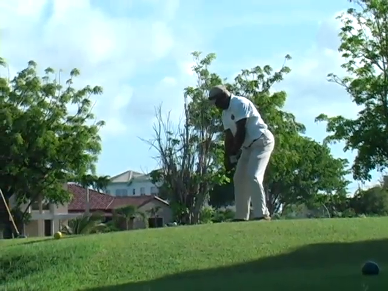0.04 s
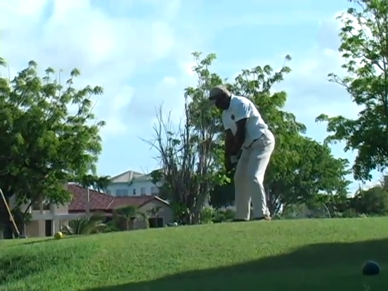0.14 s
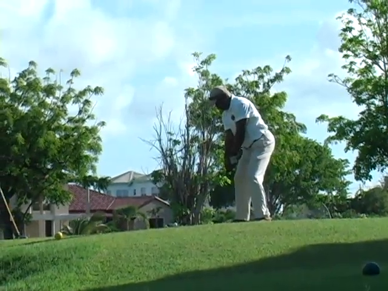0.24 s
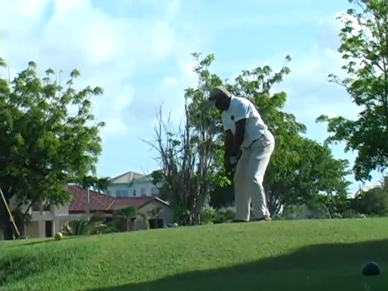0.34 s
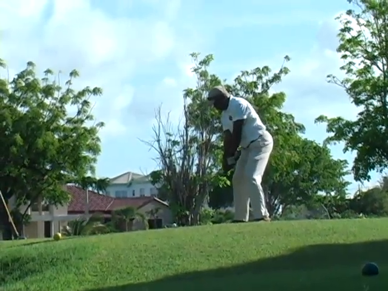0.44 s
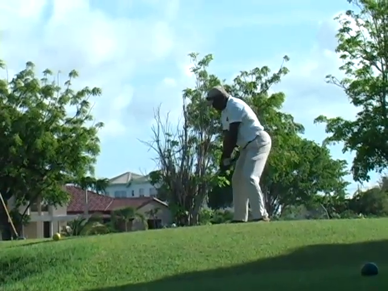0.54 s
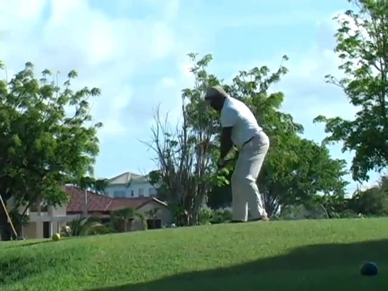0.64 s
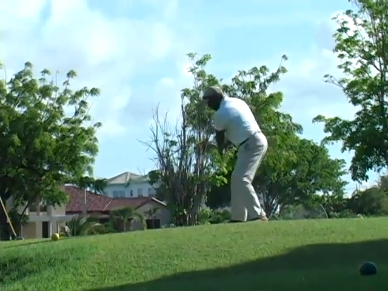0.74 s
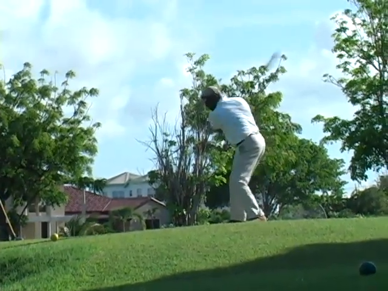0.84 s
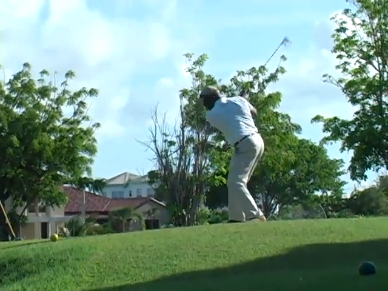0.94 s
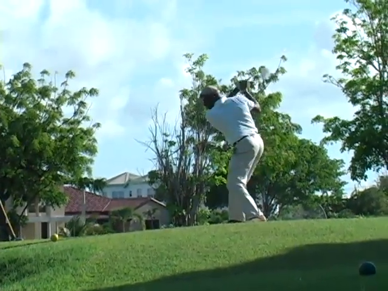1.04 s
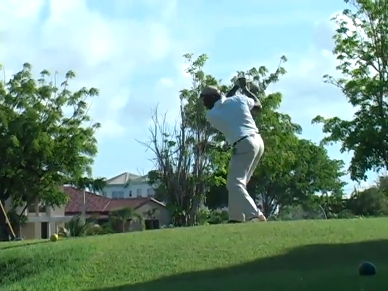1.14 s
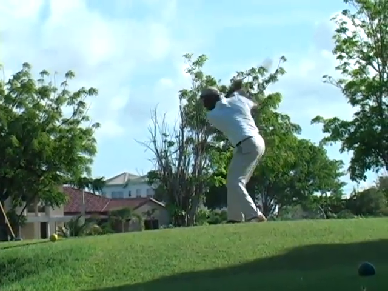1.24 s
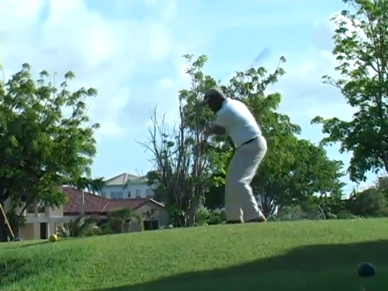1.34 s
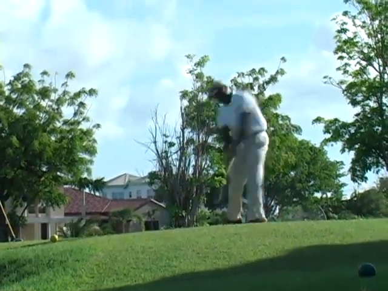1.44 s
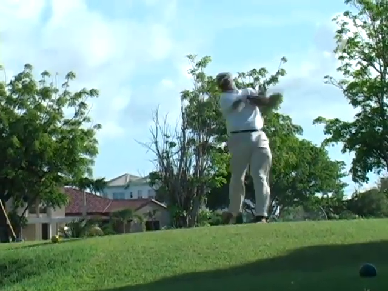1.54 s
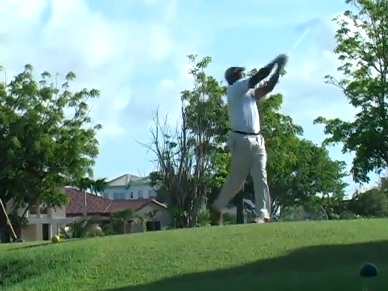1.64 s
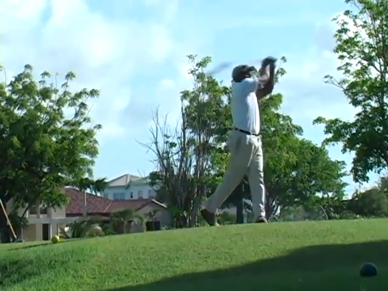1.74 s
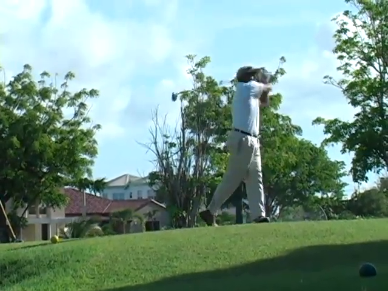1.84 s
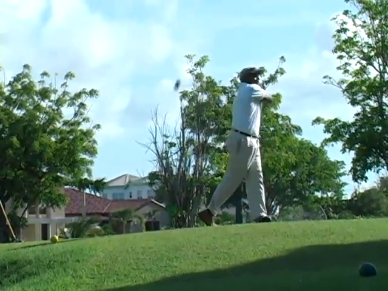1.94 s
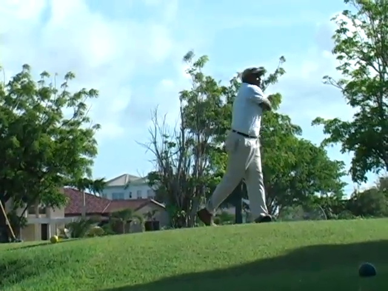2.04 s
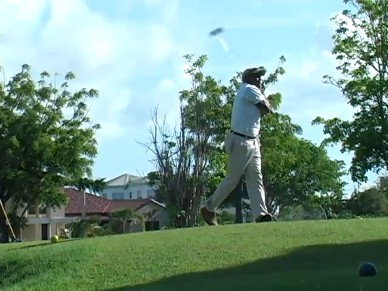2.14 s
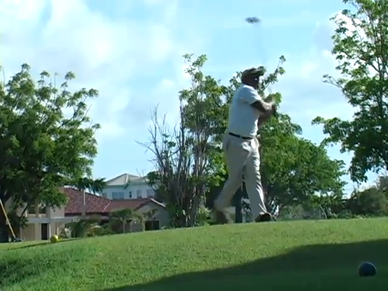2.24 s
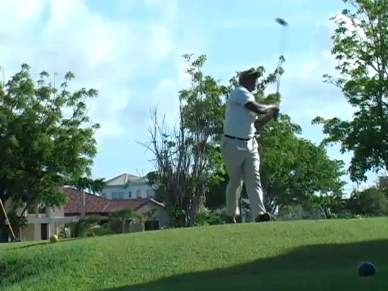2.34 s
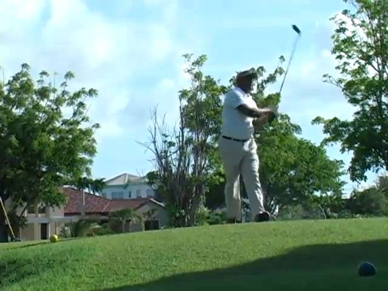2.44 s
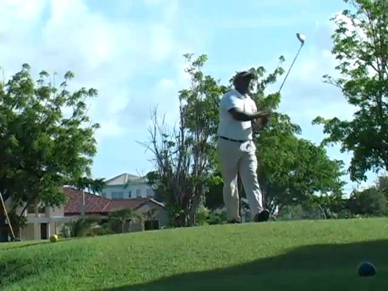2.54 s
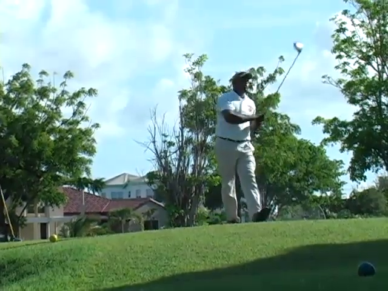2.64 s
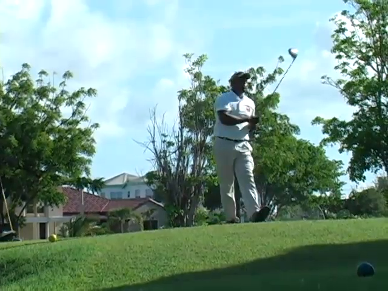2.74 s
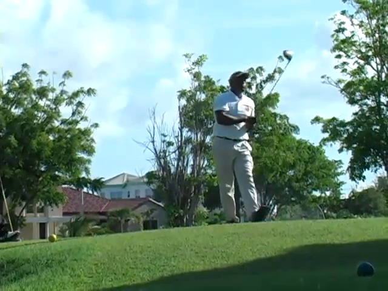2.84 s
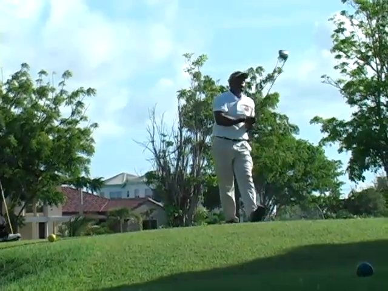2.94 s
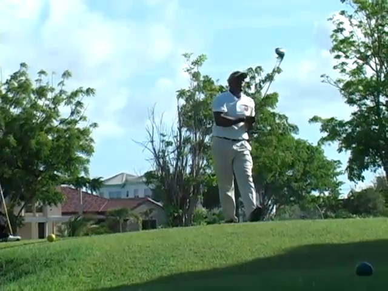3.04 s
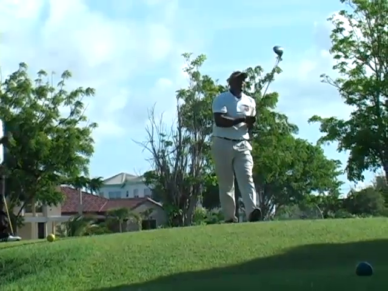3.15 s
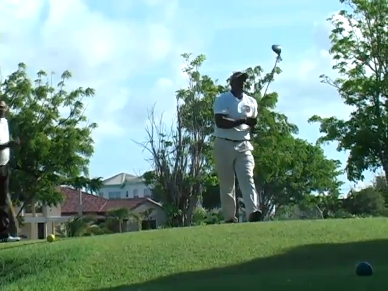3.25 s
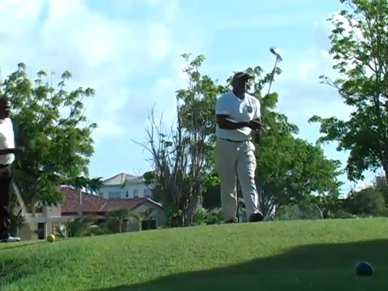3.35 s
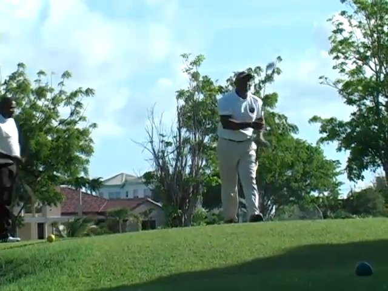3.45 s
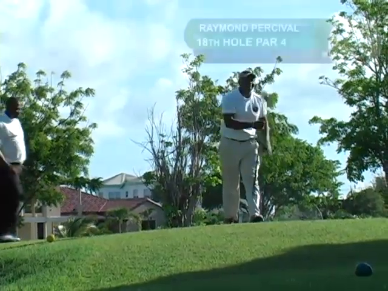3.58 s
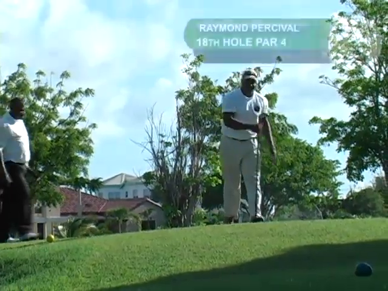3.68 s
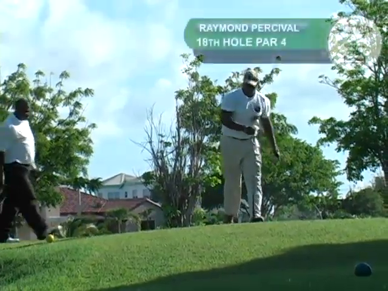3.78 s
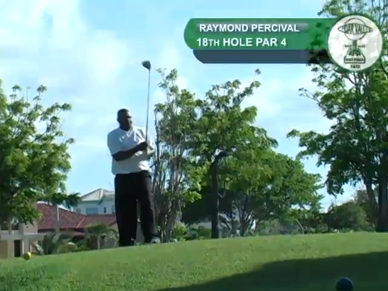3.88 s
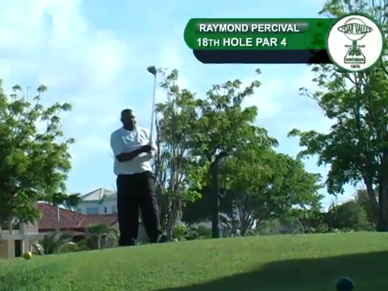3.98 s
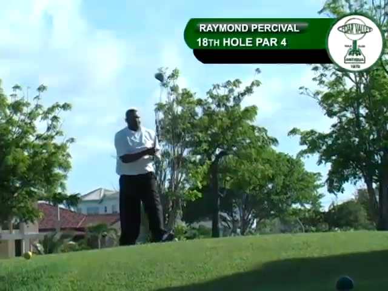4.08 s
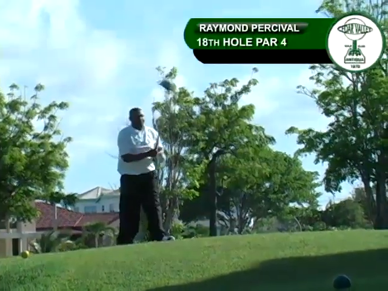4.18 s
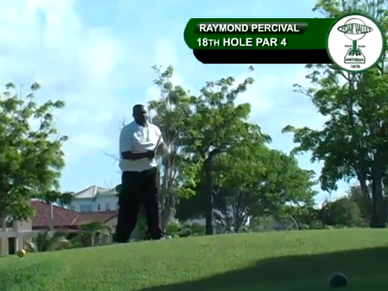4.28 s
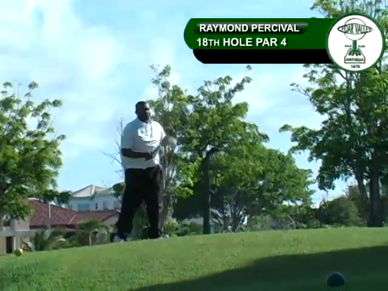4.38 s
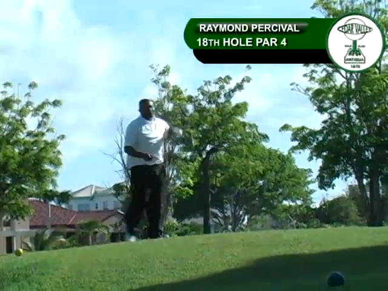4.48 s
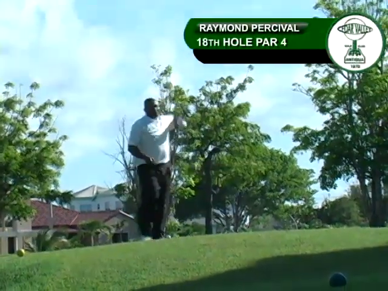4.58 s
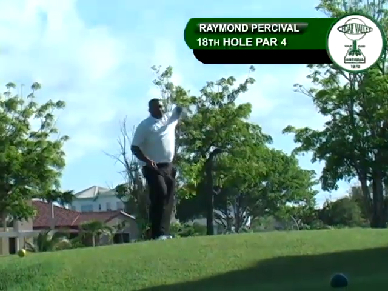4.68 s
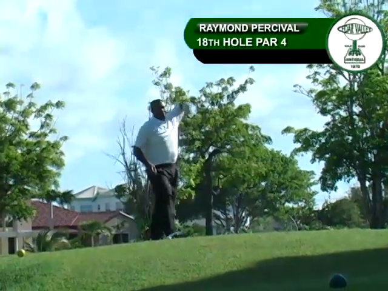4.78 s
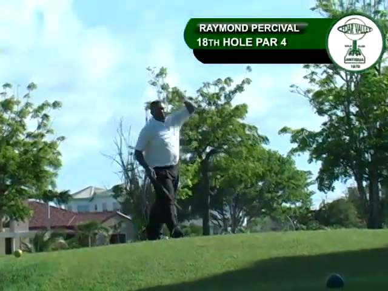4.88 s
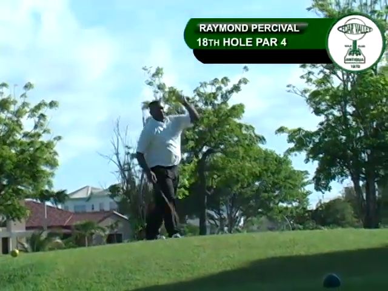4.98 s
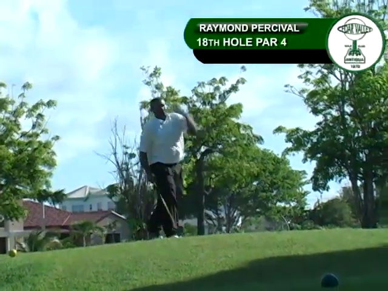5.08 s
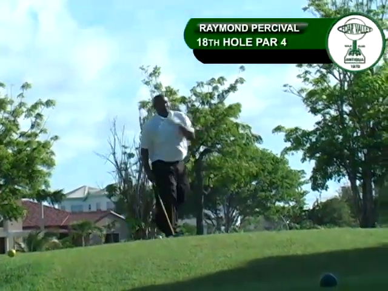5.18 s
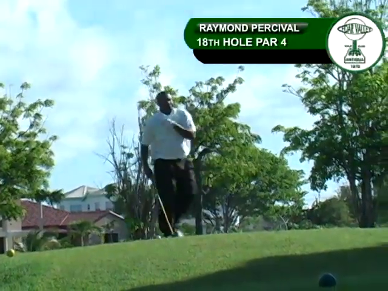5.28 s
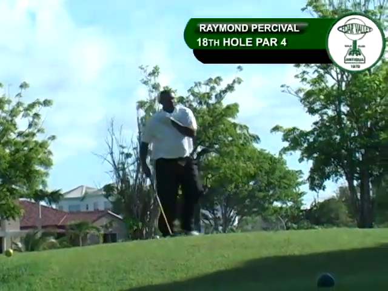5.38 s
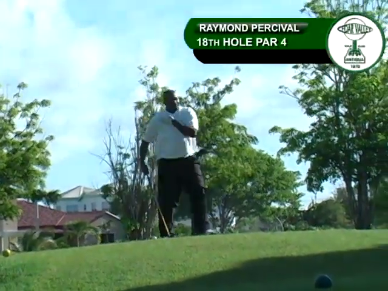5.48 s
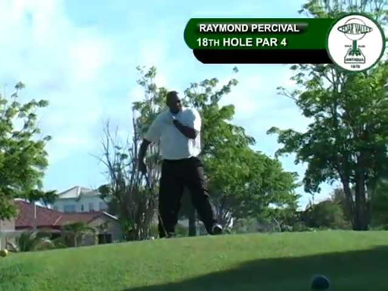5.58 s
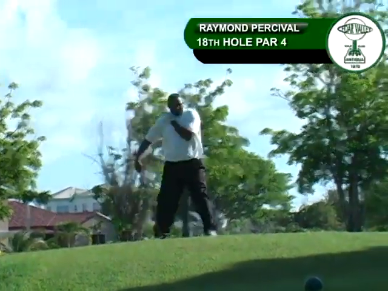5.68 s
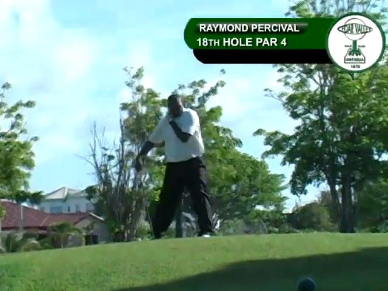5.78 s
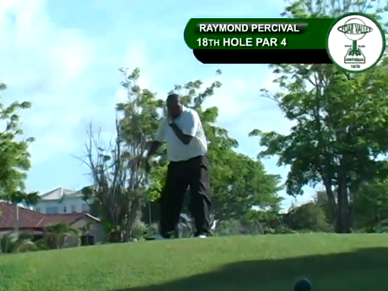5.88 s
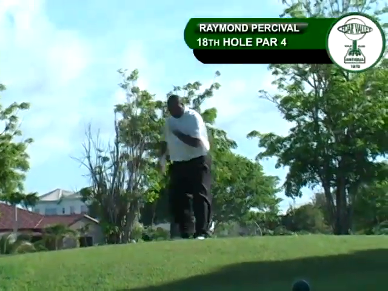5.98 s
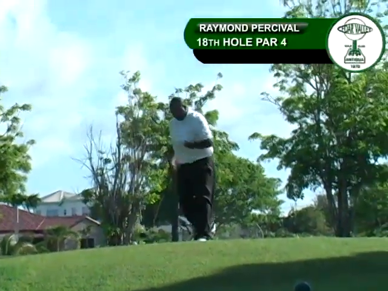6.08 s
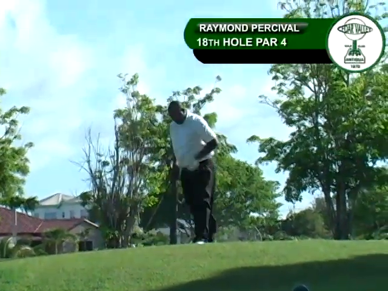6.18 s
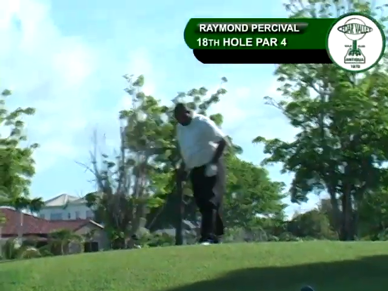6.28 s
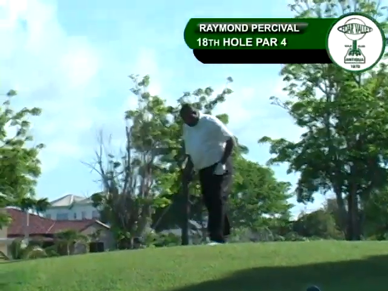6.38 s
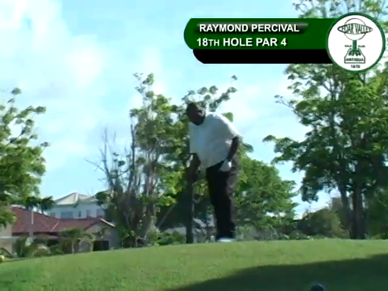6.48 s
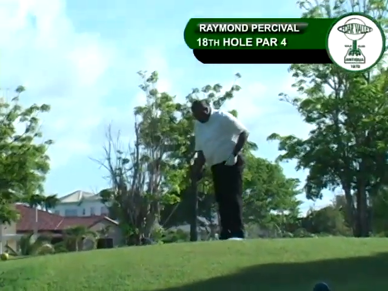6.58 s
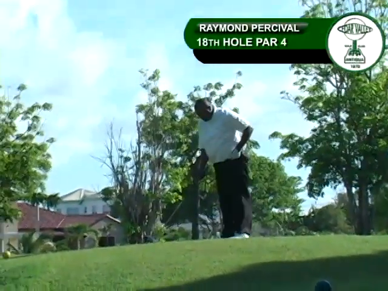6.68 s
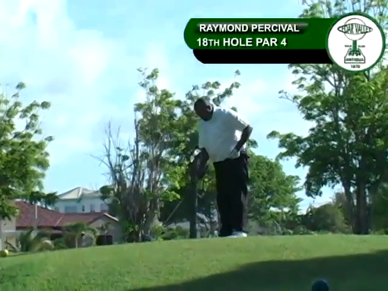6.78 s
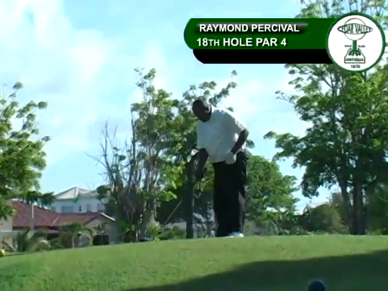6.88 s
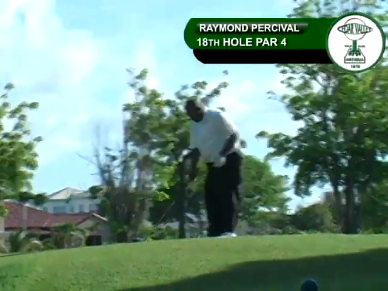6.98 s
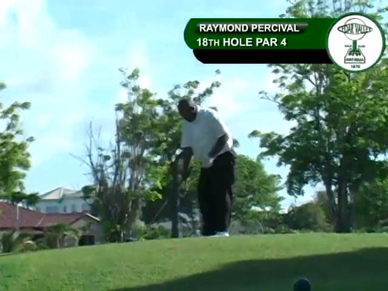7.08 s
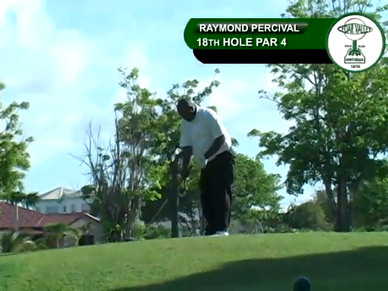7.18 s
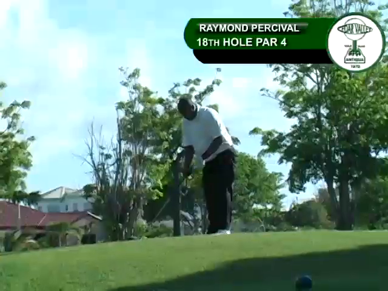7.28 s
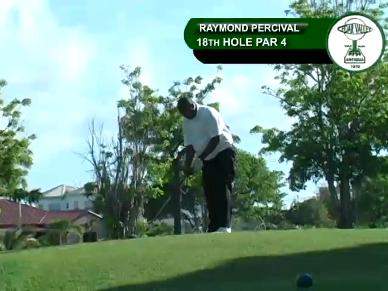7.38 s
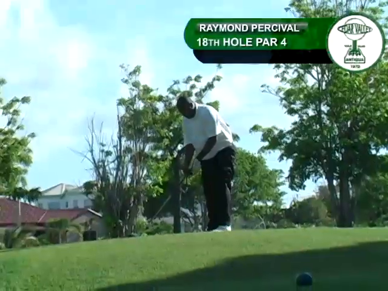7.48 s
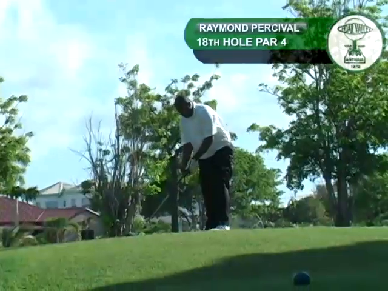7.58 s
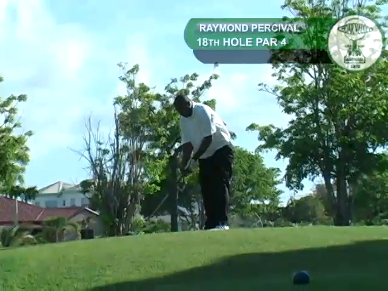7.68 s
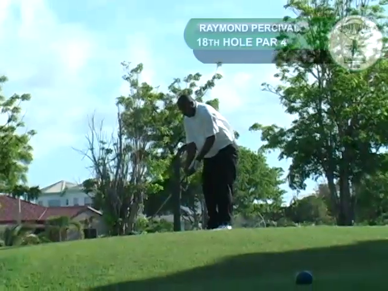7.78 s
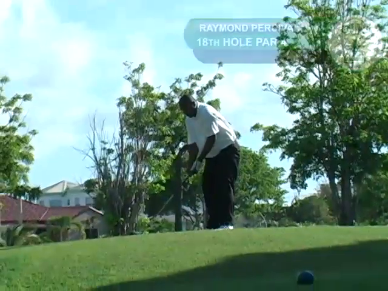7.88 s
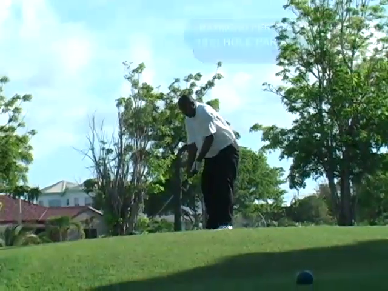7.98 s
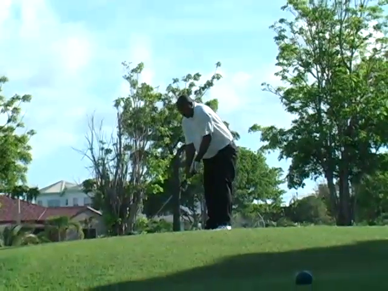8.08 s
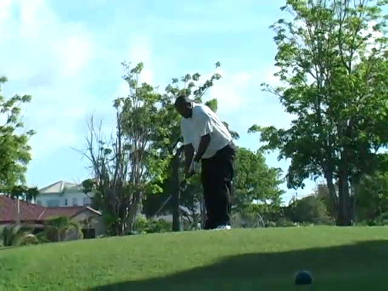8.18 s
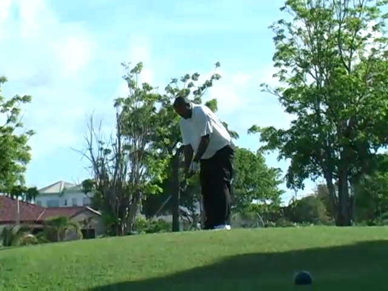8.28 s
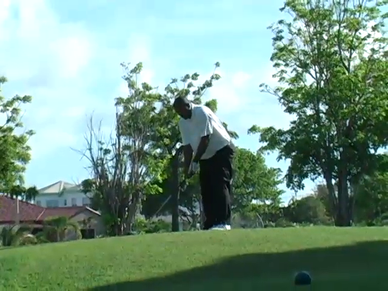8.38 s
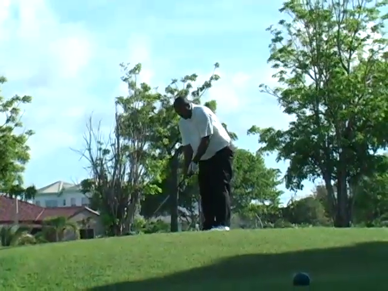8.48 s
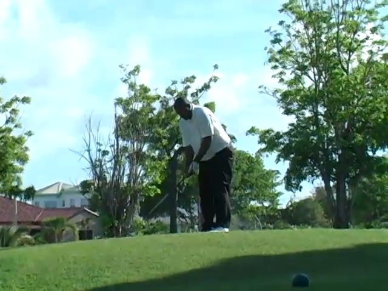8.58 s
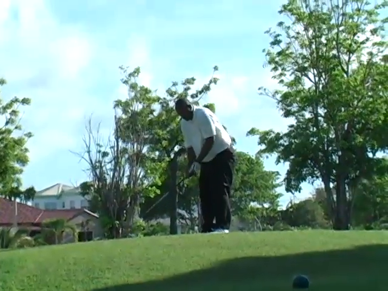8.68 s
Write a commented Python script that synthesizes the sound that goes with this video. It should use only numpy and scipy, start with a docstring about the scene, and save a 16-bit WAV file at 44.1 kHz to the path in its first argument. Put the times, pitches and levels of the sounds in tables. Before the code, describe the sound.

A single outdoor microphone near a golf tee picks up gentle air and wind buffeting. A driver whips down and strikes a ball very loudly, its thin metal head pinging and scattering back from walls and foliage. Faint falling bird notes follow, then a sudden small buzz and thud with slightly louder hush. Near the end, one close bird sings high paired whistles that swell, followed by rasping chirps, while a dog barks far away.

```python
"""Open tee near houses and trees: a hollow metal driver swishes down and cracks a ball away.
The head rings as damped modes, pitch bent by its own motion, and echoes off houses and trees.
A near songbird and farther birds whistle pitch glides; banded rough noise buzzes, bursts and hisses; a far
dog barks. Wind rumbles on the microphone over a filtered-noise hush. Levels are set before the x2 input gain.
Left: the one microphone. Right: amplifier hiss, and a thump when the left overloads."""
import sys
import numpy as np
from scipy import signal
from scipy.fft import rfft, irfft
from scipy.io import wavfile
from scipy.ndimage import uniform_filter1d, map_coordinates

SR = 44100
rng = np.random.default_rng(int(sys.argv[2]) if len(sys.argv) > 2 else 0)


def dump_mix(stems):
    """Bounce the given channels to the path in sys.argv[1] as a 16-bit WAV at rate SR."""
    frames = np.atleast_2d(stems).T  # one column per channel
    limited = np.clip(frames, -1, 1)  # hard clip at full scale
    pcm = np.round(limited * 32767).astype(np.int16)
    wavfile.write(sys.argv[1], SR, pcm)


N = 384993


def amp(db):
    """Decibels to amplitude."""
    return 10 ** (np.asarray(db) / 20)


def rms_one(x):
    """Scale to rms 1."""
    return x / np.sqrt(np.mean(x ** 2) + 1e-20)


def in_time(rows, **ends):
    """Interpolate each column over the whole scene; the first column is seconds."""
    s, *columns = np.transpose(rows)
    return [np.interp(np.arange(N) / SR, s, c, **ends) for c in columns]


def add(out, start_s, x):
    """Mix a short sound in at a time."""
    i = round(start_s * SR)
    out[i:i + len(x)] += x[:len(out) - i]


def coloured(spectrum):
    """Noise of a given spectrum, rms 1."""
    hz, db = np.transpose(spectrum)
    grid_hz = np.maximum(np.fft.rfftfreq(N, 1 / SR), 1)
    gain = amp(np.interp(np.log(grid_hz), np.log(hz), db))
    return rms_one(irfft(rfft(rng.standard_normal(N)) * gain, N))


def drift(knots_per_s):
    """Smooth random curve through unit-spread knots."""
    knots = rng.standard_normal(int(N / SR * knots_per_s) + 2)
    return map_coordinates(knots, [np.arange(N) / SR * knots_per_s], order=3)


def band(x, low_hz, high_hz):
    """Band-pass, upper edge kept below Nyquist."""
    edges_hz = [low_hz, min(high_hz, .45 * SR)]
    return signal.sosfilt(signal.butter(2, edges_hz, "band", fs=SR, output="sos"), x)


def swell(n, rise_share):
    """Rounded rise over a share of the length, rounded fall over the rest."""
    return np.sin(np.pi / 2 * np.interp(np.arange(n), [0, rise_share * n, n], [0, 1, 0]))


def tone(hz, db, overtone_db):
    """Whistle along a pitch track with its octave; levels are rms."""
    phase = 2 * np.pi * np.cumsum(hz) / SR
    octave = np.sin(2 * phase) * (hz < SR / 4)
    return np.sqrt(2) * (amp(db) * np.sin(phase) + amp(overtone_db) * octave)


def modes(table, t, bent_t):
    """Damped sines: decay runs on t, phase on bent_t."""
    return sum(amp(db - 60 * t / t60_s) * np.sin(2 * np.pi * hz * bent_t) for hz, db, t60_s in table)


def patchy(x, patchy_db, knots_per_s):
    """Third-octave bands flicker each on their own."""
    edges_hz = 250 * 2 ** np.arange(0, 6.1, 1 / 3)
    return sum(amp(patchy_db * drift(knots_per_s)) * band(x, low, high)
               for low, high in zip(edges_hz, edges_hz[1:]))


STRIKE_S, CRACK_DB = 1.5336, -3.5
GROUND_DELAY_S, GROUND_DB = .0045, -3   # bounce off the turf, re crack
SNAP_DB, SNAP_T60_S = -13, 0.014        # ball's cover; dB of the noise before its band
SIZZLE_DB, SIZZLE_T60_S = -18, 0.4      # bright early scatter; dB before its band
# face and ball modes: pitch_hz, level_db (re crack), t60_s
CRACK_MODES = [(287, -31, 0.012), (730, -31, 0.007), (1116, 2, 0.0045), (1550, 1, 0.0052),
               (1920, -4, 0.0088), (2400, -4.5, 0.0068), (4590, 0.5, 0.0077), (5040, -3.5, 0.0077),
               (6560, -4, 0.017), (9200, -7, 0.01), (11000, -9, 0.01), (12900, -23, 0.0088)]
# hollow shell modes at pitch ratio 1: pitch_hz, level_db (before path or echo gain), t60_s
HEAD_MODES = [(4180, -22.5, 0.4), (6100, -35, .2), (6380, -17.5, 0.15), (6930, -32, 0.68),
              (7030, -32, 0.49), (8260, -40, .2), (9230, -27, 0.28), (10500, -38, .12)]
# head turning and swinging away: after_blow_s, pitch_ratio, level_db
HEAD_PATH = [(0, 1.2, -22), (.016, 1.03, -7), (0.033, 1.0, 6.5), (0.048, .97, 4), (.062, .955, -10),
             (.12, 1.1, -28)]
# walls behind the tee, hearing the receding head lower: delay_s, level_db, length_s
WALL_ECHOES = [(0.105, -14, 0.019), (0.116, -26, .025), (0.146, -17.5, 0.024), (.184, -14.5, 0.016),
               (0.203, -14.5, 0.093), (0.261, -29, .05), (.32, -33, 0.097), (0.387, -39, 0.1),
               (0.55, -36, 0.04)]
# later returns are lowered less: delay_s, pitch_ratio
ECHO_PITCH = [(.105, .865), (.17, .9)]
# foliage scatter, relative spectrum: freq_hz, level_db (per Hz)
SCATTER_SPECTRUM = [(200, -38), (450, -14), (1000, -12.5), (3000, -10), (3900, 0.5), (5000, -7),
                    (6700, -1.5), (8000, -9), (10400, -10), (15500, -42)]
# foliage scatter envelope: time_s, level_db
SCATTER_LEVEL = [(1.536, -17.5), (1.55, -36.5), (1.606, -38), (1.645, -39), (1.75, -43), (1.85, -53),
                 (2.0, -68)]


def strike():
    """The blow cracks, bounces off turf and rings the shell; walls return lowered pieces of the ring."""
    out, t = np.zeros(N), np.arange(SR // 2) / SR
    path_s, pitch_ratio, path_db = np.transpose(HEAD_PATH)
    bent_t = np.cumsum(np.interp(t, path_s, pitch_ratio)) / SR   # time as compressed by head motion
    noise = rng.standard_normal((2, len(t)))
    snap = amp(SNAP_DB - 60 * t / SNAP_T60_S) * band(noise[0], 850, 10400)
    crack = modes(CRACK_MODES, t, t) + snap
    # uneven reflectors break the ring up
    rough = amp(2.5 * drift(180.3))
    waver = 1 + .015 * drift(247)
    add(out, STRIKE_S, amp(CRACK_DB) * crack)
    add(out, STRIKE_S + GROUND_DELAY_S, amp(CRACK_DB + GROUND_DB) * band(crack, 3800, 14800))
    ring = amp(np.interp(t, path_s, path_db)) * modes(HEAD_MODES, t, bent_t)
    add(out, STRIKE_S, ring * rough[:len(t)] ** .4)
    add(out, STRIKE_S, amp(SIZZLE_DB - 60 * t / SIZZLE_T60_S) * band(noise[1], 5200, 10700))
    for delay_s, db, length_s in WALL_ECHOES:
        n, i = round(length_s * SR), round(delay_s * SR)
        echo_ratio = np.interp(delay_s, *np.transpose(ECHO_PITCH))
        echo_t = np.cumsum(waver[i:i + n]) / SR * echo_ratio
        piece = band(modes(HEAD_MODES, t[:n], echo_t), 3600, 6200)
        add(out, STRIKE_S + delay_s, amp(db) * piece * swell(n, 0.15) * rough[i:i + n])
    scatter_db, = in_time(SCATTER_LEVEL, left=-200, right=-200)
    scatter = rms_one(patchy(coloured(SCATTER_SPECTRUM), patchy_db=1.2, knots_per_s=45))
    return out + amp(scatter_db) * scatter


# shaft through air: time_s, level_db (hiss rms), shedding_hz (mean, before wobble)
SHAFT_SWISH = [(1.44, -78, 496), (1.49, -55.5, 657), (1.515, -41.5, 960), (1.532, -56, 1010),
               (1.56, -61, 800), (1.6, -80.5, 600)]


def swish():
    """Vortices shed by the shaft: a wobbling hum, pitch following its speed, in broad hiss."""
    db, hz = in_time(SHAFT_SWISH, left=-200, right=-200)
    cycles = np.cumsum(np.maximum(hz, 0) * (1 + 0.242 * drift(140))) / SR
    hiss = rms_one(band(rng.standard_normal(N), 500, 8700))
    return amp(db) * (1.4 * np.sin(2 * np.pi * cycles) + hiss)


LEAD_AHEAD_S, LEAD_RISE_S, LEAD_SAG_S, LEAD_DROP_S = .0415, 0.0131, 0.0064, 0.0068
LEAD_RISE_HZ, LEAD_SAG_HZ, LEAD_DROP_HZ, LEAD_OCTAVE_DB = 3000, 450, 1900, -18
LONG_FROM_HZ, LONG_TO_HZ, LONG_OCTAVE_DB = 5500, 4200, -20
LEAD_BEND, LONG_BEND = 4.06, 2.79   # exponent: how suddenly the pitch shoots up
# lead + long note pairs; a note shoots up, sags to a knee, drops:
# long_start_s, rise_s, sag_s, drop_s, top_hz, knee_hz, knee_db, lead_top_hz, lead_knee_db
SONG_PAIRS = [(6.017, .019, 0.0095, .008, 7000, 6600, -39, 6950, -48),
              (6.137, 0.017, .010, 0.008, 7100, 6670, -36.5, 7300, -43),
              (6.253, 0.019, 0.039, .011, 7120, 6070, -34, 7200, -42),
              (6.413, 0.011, 0.052, 0.014, 7320, 6080, -32, 7420, -42.5),
              (6.577, 0.015, 0.055, 0.0075, 7560, 6090, -30, 7450, -43.5),
              (6.748, .012, .050, .030, 7680, 6390, -29, 7500, -38),
              (6.945, 0.012, 0.04, 0.043, 7580, 6720, -29, 7410, -41),
              (7.146, 0.0088, 0.04, 0.059, 7950, 6970, -30, 7270, -40.5)]


def song_notes():
    """Spell each pair out: times, pitches, levels and bend of both notes."""
    for start_s, rise_s, sag_s, drop_s, top_hz, knee_hz, knee_db, lead_hz, lead_db in SONG_PAIRS:
        lead_knee_hz = lead_hz - LEAD_SAG_HZ
        yield (start_s - LEAD_AHEAD_S, LEAD_RISE_S, LEAD_SAG_S, LEAD_DROP_S,
               lead_hz - LEAD_RISE_HZ, lead_hz, lead_knee_hz, lead_knee_hz - LEAD_DROP_HZ,
               lead_db, LEAD_OCTAVE_DB, LEAD_BEND)
        yield (start_s, rise_s, sag_s, drop_s, LONG_FROM_HZ, top_hz, knee_hz, LONG_TO_HZ,
               knee_db, LONG_OCTAVE_DB, LONG_BEND)


# attack, shoulder and beak hiss re top; fade re knee
ATTACK_S, ATTACK_DB, SHOULDER_DB, FADE_DB, BEAK_HISS_DB = 0.0038, -19, -5.5, -18.5, -23.5
# longer notes grow toward the knee: length_s, top_to_knee_db
NOTE_GROWTH = [(.062, -3.5), (.085, 6.5)]


def songbird():
    """Near-pure notes with a flutter in level and air hissing past the beak."""
    hiss = rms_one(band(rng.standard_normal(SR // 4), 5100, 14400))
    out, flutter = np.zeros(N), amp(2.4 * drift(250))
    for (start_s, rise_s, sag_s, drop_s, from_hz, top_hz, knee_hz, to_hz,
         knee_db, overtone_db, bend) in song_notes():
        top_s, knee_s, end_s = np.cumsum([rise_s, sag_s, drop_s])
        t = np.arange(0, end_s, 1 / SR)
        rise = np.clip((top_s - t) / rise_s, 0, 1) ** bend
        sag = np.clip((t - top_s) / sag_s, 0, 1) ** 1.4
        drop = np.clip((t - knee_s) / drop_s, 0, 1) ** 1.06
        hz = top_hz - (top_hz - from_hz) * rise - (top_hz - knee_hz) * sag - (knee_hz - to_hz) * drop
        top_db = knee_db - np.interp(end_s, *np.transpose(NOTE_GROWTH))
        db = np.interp(t, [0, ATTACK_S, top_s, knee_s, end_s],
                       [top_db + ATTACK_DB, top_db + SHOULDER_DB, top_db, knee_db, knee_db + FADE_DB])
        octave_db = db + overtone_db - 8 * rise - 1.5 * drop   # relatively strongest mid-note
        whistle = tone(uniform_filter1d(hz, size=60), db, octave_db)
        note = whistle + amp(top_db + BEAK_HISS_DB) * hiss[:len(t)]
        add(out, start_s, note * signal.windows.tukey(len(t), .1))
    return out * flutter


# single glides of far birds: start_s, length_s, start_hz, end_hz, level_db
GLIDES = [(1.06, .02, 5460, 5500, -66), (1.108, 0.025, 5800, 5700, -69), (1.2, .14, 4220, 4220, -72),
          (1.367, 0.1, 3960, 4280, -66), (3.032, 0.032, 5220, 4900, -61), (3.145, .032, 4000, 3300, -66),
          (4.045, .017, 11200, 10200, -52), (4.04, .016, 7370, 8350, -49), (7.131, 0.31, 4970, 4320, -54.5),
          (7.178, 0.29, 9800, 8450, -51.5), (7.488, .02, 6880, 6520, -41), (7.62, 0.05, 8020, 7920, -45),
          (7.625, 0.055, 6350, 6690, -46), (7.726, 0.015, 7300, 7360, -48.5),
          (7.738, .052, 6770, 5930, -55), (7.782, .018, 5700, 5100, -59), (7.795, .012, 4700, 3800, -62),
          (7.943, 0.03, 6957, 6800, -61), (8.048, 0.026, 8260, 8220, -56), (8.402, 0.036, 5530, 4650, -57),
          (8.618, .058, 5930, 4270, -59)]
# run of falling notes, farther bird: start_s, start_hz, level_db
FALLING_RUN = [(2.265, 5740, -64.5), (2.364, 5630, -64), (2.461, 5740, -63.5), (2.565, 5700, -63.5),
               (2.67, 5900, -64), (2.792, 5020, -60), (2.901, 5370, -58), (3.011, 4890, -60),
               (3.099, 4130, -64)]
RUN_NOTE_S, RUN_END_HZ = .06, 3870
# far singer, high falling notes: start_s, length_s, level_db
HIGH_FALLS = [(2.056, 0.076, -65), (2.735, 0.068, -60), (2.908, 0.048, -62), (3.094, .049, -61.5),
              (7.99, 0.025, -59.5), (8.144, .04, -59), (8.315, .047, -57), (8.496, 0.059, -55.5),
              (8.692, 0.041, -56.5)]
# far singer, short rising notes: start_s, length_s, level_db
SHORT_RISES = [(2.785, .014, -56), (2.95, .03, -61), (7.445, 0.0118, -49), (8.015, .031, -57),
               (8.071, 0.0108, -48.5), (8.202, 0.025, -56), (8.565, 0.027, -54)]
FALL_FROM_HZ, FALL_HZ_PER_S, RISE_FROM_HZ, RISE_TO_HZ = 7600, 35000, 5500, 7130
# low twitter of quick upward flicks: start_s, start_hz, level_db
TWITTER_FLICKS = [(3.385, 4200, -68), (3.455, 4300, -65), (3.54, 4100, -64), (3.6, 3900, -64),
                  (3.638, 4100, -66), (3.72, 3800, -64), (8.239, 4200, -52.5), (8.29, 3800, -57),
                  (8.32, 3900, -54), (8.39, 4300, -53), (8.437, 4250, -53)]
FLICK_S, FLICK_HZ = .024, 446


def far_notes():
    """Every far glide as (start_s, length_s, start_hz, end_hz, level_db)."""
    run = [(s, RUN_NOTE_S, hz, RUN_END_HZ, db) for s, hz, db in FALLING_RUN]
    falls = [(s, length_s, FALL_FROM_HZ, FALL_FROM_HZ - FALL_HZ_PER_S * length_s, db)
             for s, length_s, db in HIGH_FALLS]
    rises = [(s, length_s, RISE_FROM_HZ, RISE_TO_HZ, db) for s, length_s, db in SHORT_RISES]
    flicks = [(s, FLICK_S, hz, hz + FLICK_HZ, db) for s, hz, db in TWITTER_FLICKS]
    return GLIDES + run + falls + rises + flicks


def chirps():
    """Glides that ease off toward their end, slightly uneven in pitch and level."""
    out, shake, flutter = np.zeros(N), 1 + .009 * drift(500), amp(3.5 * drift(150))
    for start_s, length_s, from_hz, to_hz, db in far_notes():
        i = round(start_s * SR)
        n = min(round(length_s * SR), N - i)
        hz = to_hz + (from_hz - to_hz) * np.linspace(1, 0, n) ** 1.35
        add(out, start_s, tone(hz * shake[i:i + n], db, -120) * swell(n, 0.59) ** .5)
    return out * flutter


WARBLE_PER_S, WARBLE_SWING_HZ, WARBLE_SHRINK = 58, 2080, .6   # shrink: share of swing lost by the end
# high whistle swinging fast in pitch: start_s, length_s, centre_hz, level_db
WARBLE_CALLS = [(2.308, .09, 8050, -53.5)]


def warbles():
    """A whistle whose pitch swings up first, then down and up, narrowing as it goes."""
    out, flutter = np.zeros(N), amp(3.1 * drift(300))
    for start_s, length_s, hz, db in WARBLE_CALLS:
        t = np.arange(0, length_s, 1 / SR)
        width_hz = WARBLE_SWING_HZ * (1 - WARBLE_SHRINK * t / length_s)
        swing_hz = width_hz * np.sin(2 * np.pi * WARBLE_PER_S * t)
        add(out, start_s, tone(hz + swing_hz, db, -120) * swell(len(t), 0.32))
    return out * flutter


CLICKS_PER_S = 1000   # mean rate, random timing
# buzzy sounds, short broad noise bursts and, at 6.9 s, a broad soft hiss under the song:
# start_s, length_s, centre_hz, width_hz (per filter pass), level_db (before swell)
NOISE_BURSTS = [(0.014, .045, 8260, 2000, -58), (.3, .11, 9150, 1800, -62), (.985, .105, 8940, 3000, -56.5),
                (2.334, 0.079, 7960, 3200, -50), (2.8, 0.58, 6960, 1500, -66), (3.39, .51, 4400, 1100, -69),
                (3.89, 0.14, 10200, 10200, -49.5), (3.905, 0.0087, 8550, 7000, -46.5),
                (3.914, 0.12, 8300, 900, -41.5), (3.924, 0.09, 6800, 1590, -47),
                (4.852, .066, 8500, 2500, -57.5), (6.9, .52, 7300, 4500, -53),
                (7.452, 0.2, 7220, 3070, -44.5), (7.5, 0.27, 11900, 5000, -62),
                (7.572, .14, 6720, 2700, -46.5), (7.644, 0.034, 3330, 2500, -50),
                (7.815, 0.11, 7200, 2500, -57), (8.167, 0.049, 4450, 500, -57.5),
                (8.354, 0.035, 4200, 400, -57), (8.456, 0.13, 4500, 700, -61)]


def noise_bursts():
    """Rough noise with sparse random clicks, through one band per row."""
    out, draw, size = np.zeros(N), rng.random(N), rng.standard_normal(N)
    for start_s, length_s, hz, width_hz, db in NOISE_BURSTS:
        part = slice(round(start_s * SR), round((start_s + length_s) * SR))
        rough_noise = size[part] * ((draw[part] < CLICKS_PER_S / SR) + 0.29)
        edges_hz = hz - width_hz / 2, hz + width_hz / 2
        burst = rms_one(band(band(rough_noise, *edges_hz), *edges_hz))
        add(out, start_s, amp(db) * burst * swell(len(burst), 0.32))
    return out


# far dog: start_s, end_s, start_hz, end_hz (before arch and shake), level_db, overtone_db, rasp_db
DOG_BARKS = [(1.25, 1.347, 624, 465, -52.5, -68, -63), (3.41, 3.51, 528, 474, -51.5, -65, -58.5),
             (6.69, 6.787, 502.5, 482, -55, -66, -55), (6.961, 7.053, 479, 486, -60, -67, -56.5),
             (8.32, 8.409, 403, 422.6, -66, -57, -58)]


def barks():
    """An arched, shaky pitch with rasp in the throat band."""
    out, shake = np.zeros(N), 1 + 0.026 * drift(150)
    rasp = rms_one(band(rng.standard_normal(N), 570, 1000))
    for start_s, end_s, from_hz, to_hz, db, overtone_db, rasp_db in DOG_BARKS:
        n, i = round((end_s - start_s) * SR), round(start_s * SR)
        arch = .92 + 0.0965 * swell(n, 0.5)
        hz = np.linspace(from_hz, to_hz, n) * arch * shake[i:i + n]
        voice = tone(hz, db, overtone_db) + amp(rasp_db) * rasp[i:i + n]
        add(out, start_s, voice * swell(n, 0.51))
    return out


FOLIAGE_T60_S, FOLIAGE_DB = 1, -6.5
WASH_BREAK_S = 7.425   # wash of earlier sounds breaks off here
# single trunk returns: delay_s, level_db
TRUNK_ECHOES = [(.017, -22), (.034, -30)]


def foliage(x):
    """Leaves return a dense dying wash, trunks a few single echoes; both lose the highest treble."""
    t = np.arange(SR // 2) / SR
    decay = amp(-60 * t / FOLIAGE_T60_S) + 2.9 * amp(-60 * t / 0.08)   # near leaves die fast
    wash = rng.standard_normal(len(t)) * decay * np.minimum(t / 0.0033, 1)
    wash = wash * amp(1.5 * drift(70)[:len(t)])   # clumps of trees
    wash = amp(FOLIAGE_DB) * wash / np.sqrt(np.sum(wash ** 2))
    for delay_s, db in TRUNK_ECHOES:
        add(wash, delay_s, amp([db]))
    early = np.clip((WASH_BREAK_S - np.arange(N) / SR) / .015, 0, 1)
    early_wet = early * signal.fftconvolve(early * x, wash)[:N]
    late_wet = signal.fftconvolve((1 - early) * x, wash)[:N]
    smear = 1 + 0.5 * drift(1400)   # moving leaves smear the pitch
    return band((early_wet + late_wet) * smear, 300, 11000)


# soft low knocks: start_s, peak_db, pitch_hz
LOW_THUDS = [(1.534, -47, 70), (3.906, -40.5, 372), (3.907, -42, 122), (3.949, -39, 103), (4.901, -33, 103),
             (6.214, -37, 250)]


def thuds():
    """A damped low ring each."""
    out, t = np.zeros(N), np.arange(SR // 8) / SR
    for start_s, db, hz in LOW_THUDS:
        add(out, start_s, amp(db - 60 * t / 0.083) * np.sin(2 * np.pi * hz * t))
    return out


LUMPS_DB, LUMPS_PER_S = 2.5, 8.0   # uneven buffeting within a gust
# gusts on the microphone, mean levels: time_s, rumble_db, flutter_db
WIND_GUSTS = [(0, -59, -64.5), (.35, -66, -69), (.78, -60, -70), (1.1, -72, -66), (1.36, -59, -75),
              (1.65, -74, -66), (2.28, -69, -57), (3.0, -80, -64), (3.87, -69, -64), (3.94, -49.5, -52),
              (4.28, -52, -56), (4.84, -60.5, -66.5), (5.2, -57, -61), (5.55, -48, -54.5), (6.08, -61, -60),
              (6.42, -52, -55), (7.15, -67, -59), (7.56, -68, -64), (8.3, -58.5, -62), (8.73, -68, -69)]


def wind():
    """Lumpy low pressure swings and a faster flutter of the windscreen."""
    rumble_db, flutter_db = in_time(WIND_GUSTS)
    lumps_db = LUMPS_DB * drift(LUMPS_PER_S)
    rumble = rms_one(band(band(rng.standard_normal(N), 16, 56), 17.0, 114))
    flutter = rms_one(band(rng.standard_normal(N), 81, 182))
    flutter_db = flutter_db + 0.52 * lumps_db + 2.3 * drift(15)
    return amp(rumble_db + lumps_db) * rumble + amp(flutter_db) * flutter


AIR_DB, HUM_HZ, HUM_DB = -53.5, 39.8, -71   # hum: a far motor drones
AIR_STEP_S, AIR_STEP_DB = 3.905, 1.5        # hush louder and brighter from here
# distant outdoor hush, relative spectrum: freq_hz, level_db (per Hz)
AIR_SPECTRUM = [(12, -41), (20, 3), (47, -14), (85, -9.5), (232, -1), (428, -2.5), (2340, -18.5),
                (8890, -18.5), (15500, -26.5)]


def air():
    """Hush of wind in leaves and far traffic as swaying coloured noise, plus a narrow-band motor hum."""
    hush = coloured(AIR_SPECTRUM)
    later = np.arange(N) / SR > AIR_STEP_S
    hum = amp(HUM_DB) * rms_one(band(rng.standard_normal(N), HUM_HZ - 5, HUM_HZ + 5))
    sway_db = .5 * drift(3)
    step = later * (amp(AIR_STEP_DB) - 1) * band(hush, 320, 22000)
    return hum + amp(AIR_DB + sway_db) * (hush + step)


FAR_WET_DB = 4   # far callers reach the microphone with more wash


def scene():
    """Sum all sources into the left input at x2 gain; the right input is silent."""
    near, far, rough = songbird(), chirps() + warbles() + barks(), noise_bursts()
    wet = foliage(near + amp(FAR_WET_DB) * far + rough)
    mono = strike() + swish() + near + far + rough + wet + thuds() + wind() + air()
    return np.stack([2 * mono, np.zeros(N)])


RIGHT_HISS_DB, LEAK_DB, CUTOFF_HZ = -72.5, -29, 15700   # hiss dB before the cutoff


def record(dry):
    """Left input clips; the clipped excess pulls on the supply and thumps in the right; the top is cut."""
    left = np.clip(dry[0], -.88, .88)
    thump = -amp(LEAK_DB) * band(np.abs(dry[0] - left), 25, 220)
    right = thump + amp(RIGHT_HISS_DB) * rng.standard_normal(N)
    low_pass = signal.ellip(12, .5, 70, CUTOFF_HZ, fs=SR, output="sos")
    return signal.sosfilt(low_pass, np.stack([left, right]))


dry = scene()
out = record(dry)
dump_mix(out)
```